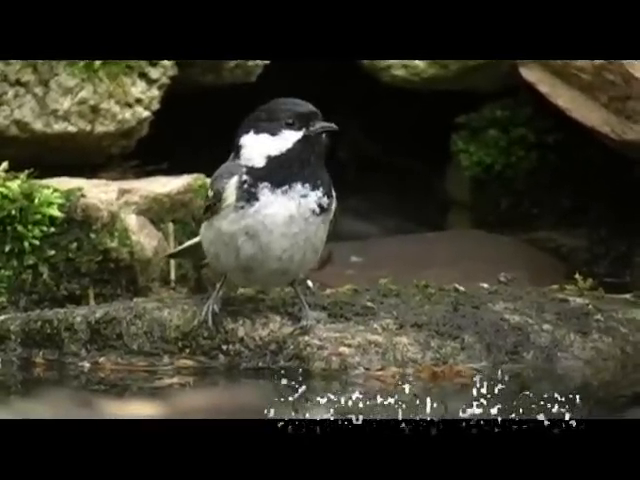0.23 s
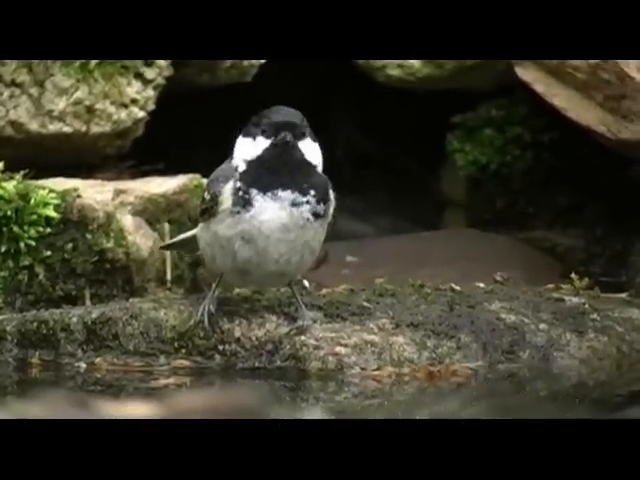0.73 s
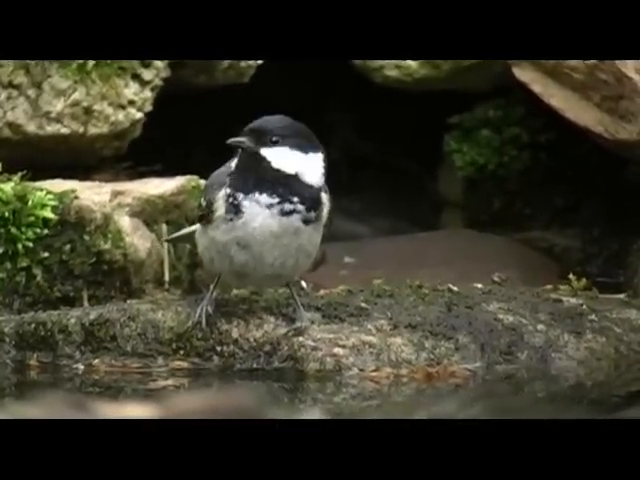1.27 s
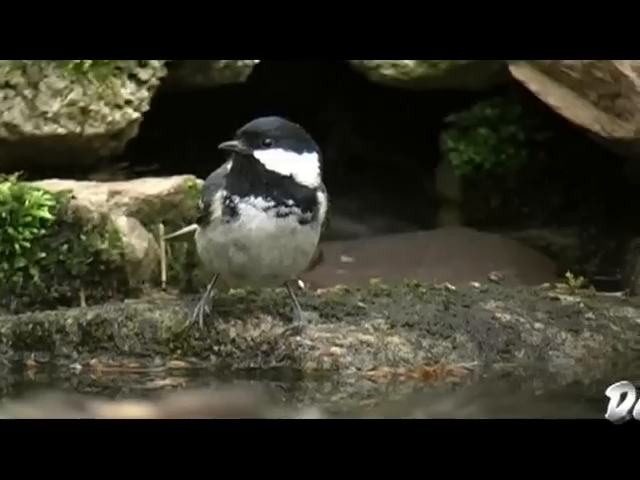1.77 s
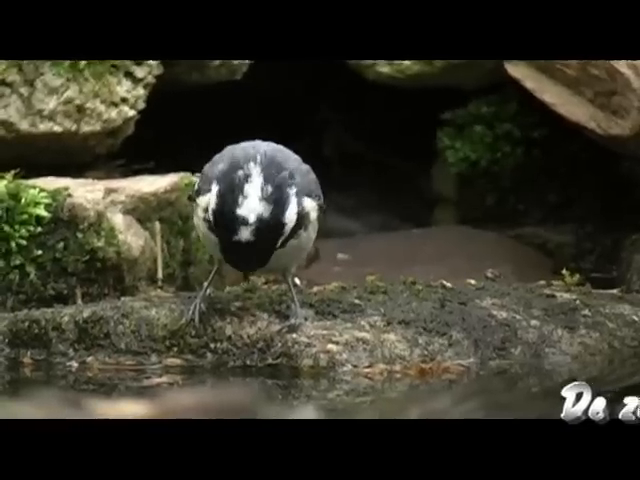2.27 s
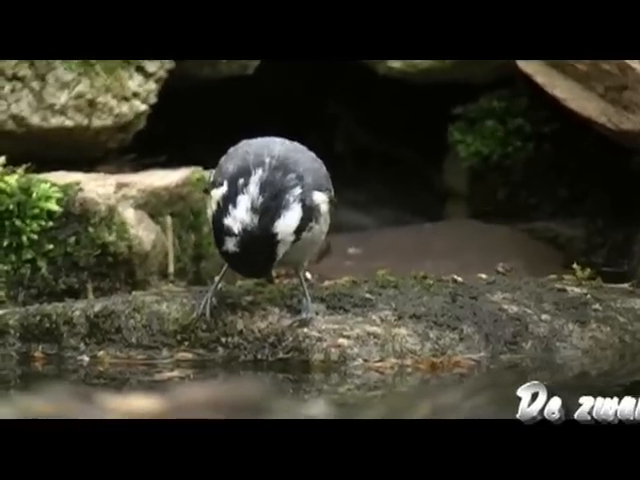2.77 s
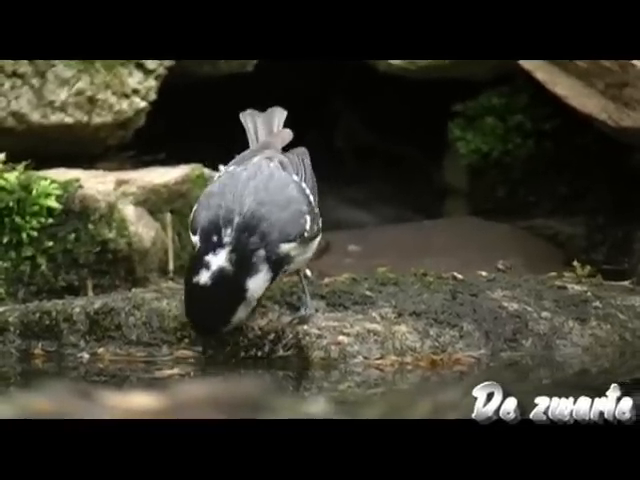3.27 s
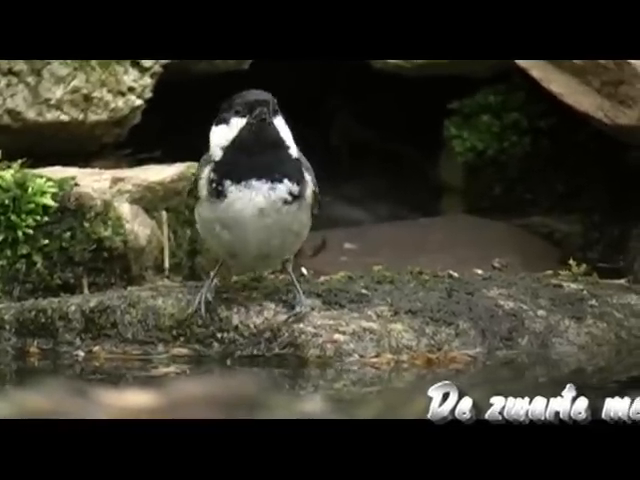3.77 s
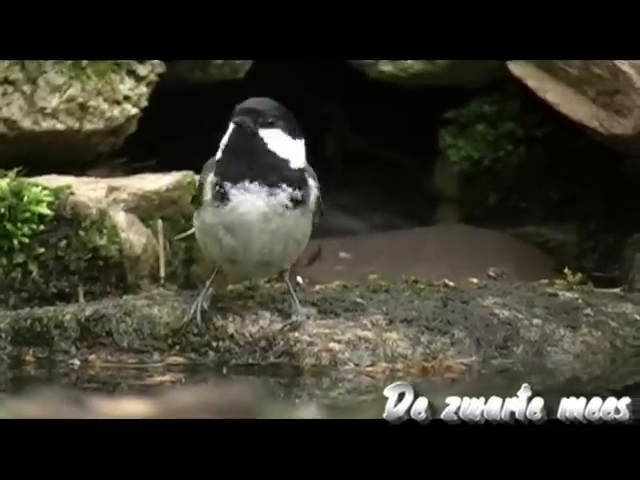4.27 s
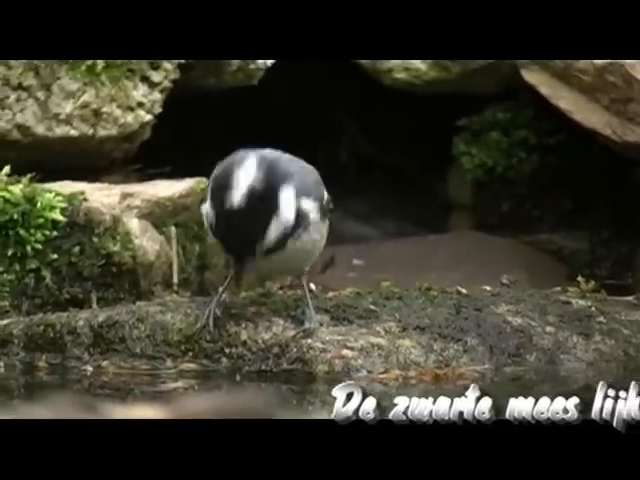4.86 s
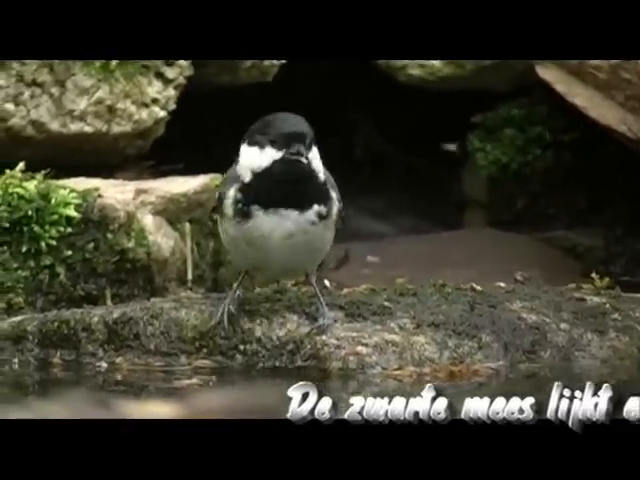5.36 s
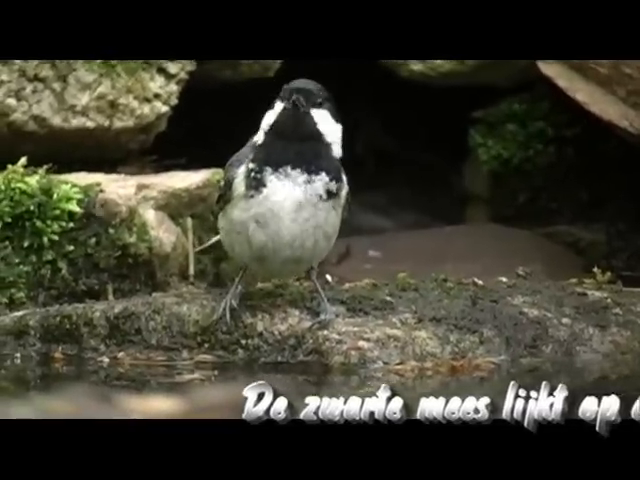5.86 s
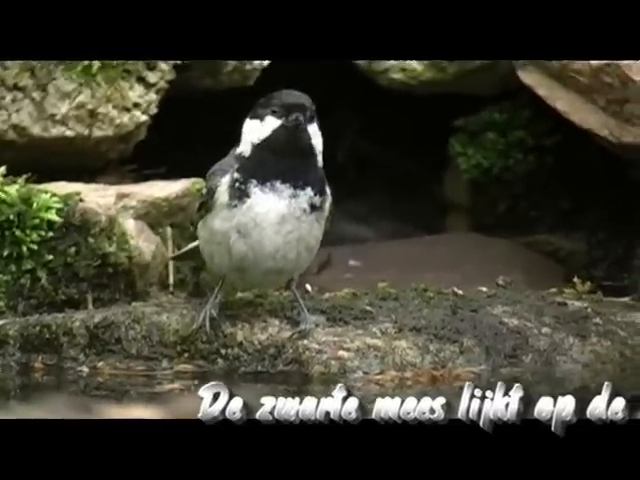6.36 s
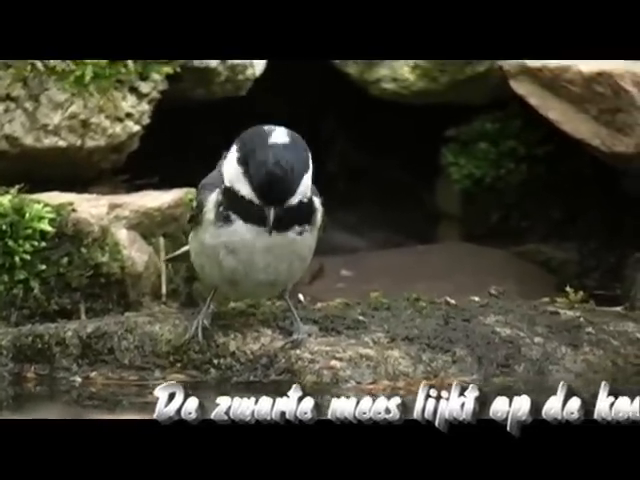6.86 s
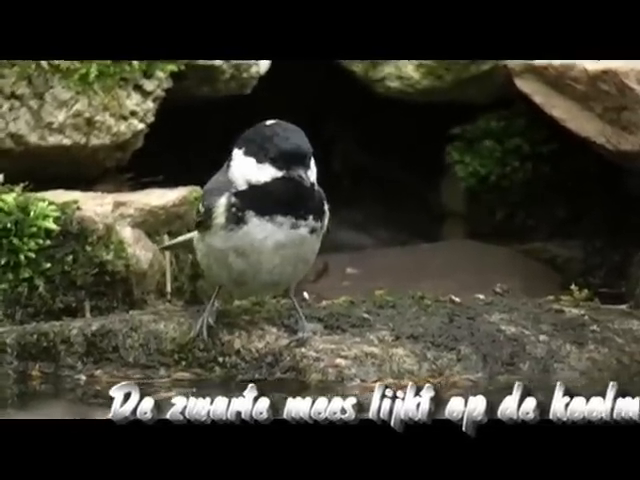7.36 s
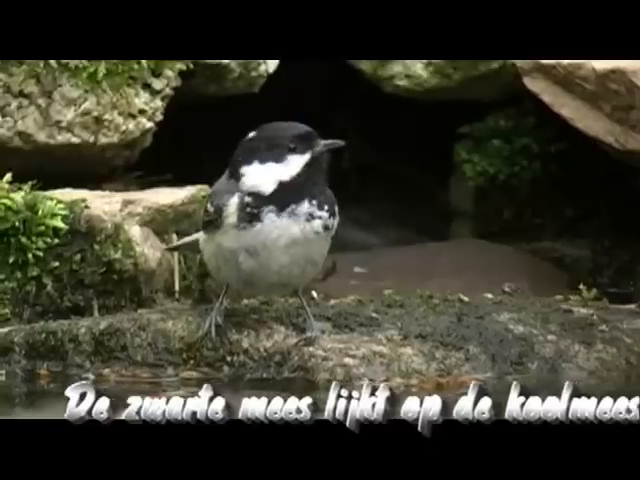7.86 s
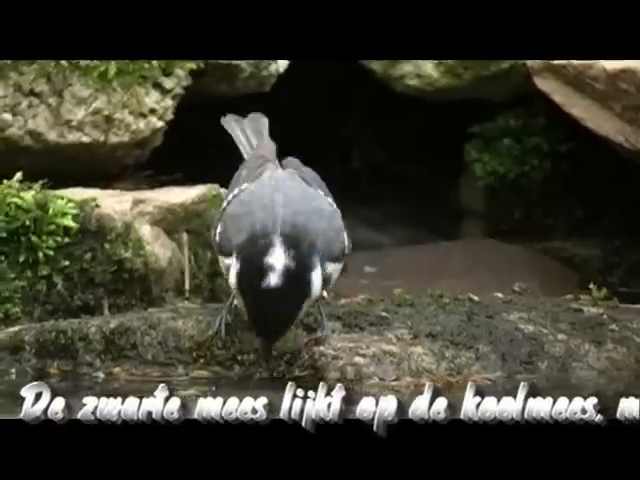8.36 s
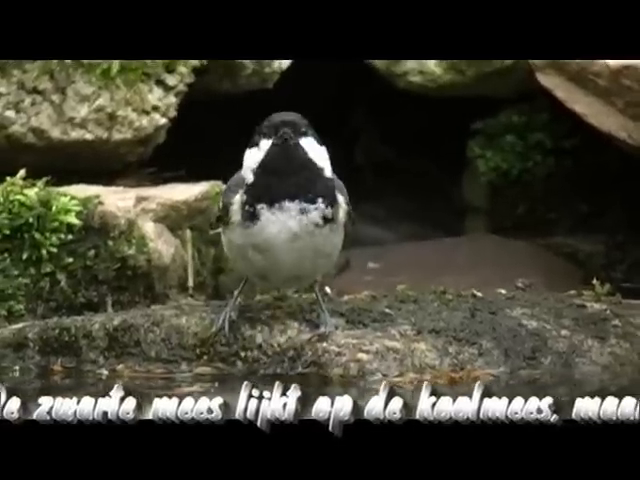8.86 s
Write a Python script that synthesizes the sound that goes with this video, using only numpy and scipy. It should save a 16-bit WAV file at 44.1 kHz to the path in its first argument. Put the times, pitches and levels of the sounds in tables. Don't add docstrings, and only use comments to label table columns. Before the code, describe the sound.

A small bird sings two brisk phrases of high seesawing whistles in a walled garden, with lower thrush-like warbles between, over distant traffic and hum.

```python
import sys
import numpy as np
from scipy import signal
from scipy.io import wavfile
from scipy.ndimage import uniform_filter1d

SR = 44100
rng = np.random.default_rng(int(sys.argv[2]) if len(sys.argv) > 2 else 0)


def field_ratio(decibels):
    return 10 ** (np.asarray(decibels, dtype=float) / 20)


def to_wav(s):
    ch = np.atleast_2d(s).T
    pcm = np.round(np.clip(ch, -1, 1) * 32767)
    wavfile.write(sys.argv[1], SR, pcm.astype(np.int16))


N = 401751


def unit_rms(x):
    return x / np.sqrt(np.mean(x ** 2) + 1e-20)


def read_spectrum(points, hz):
    f, value = np.transpose(points)
    return np.interp(np.log(hz + 1), np.log(f + 1), value)


def fader(rows):
    db = np.interp(np.arange(N) / SR, *np.transpose(rows))
    return field_ratio(uniform_filter1d(db, size=2000))


def add(mix, start_s, sound):
    part = mix[round(start_s * SR):][:len(sound)]
    part += sound[:len(part)]


def drift(count, size):
    smooth = uniform_filter1d(rng.standard_normal(count), size)
    return unit_rms(uniform_filter1d(smooth, size))


# pitch_hz, likeness (0 to 1)
LIKENESS = [(130, 0.99), (290, 0.87), (640, 0.18), (1400, 0.069), (3100, 0.59), (6800, 0.7), (15000, 0.31)]


def noise(spectrum, patchy_db):
    frames = N // 256 + 5
    hz = np.arange(0, spectrum[-1][0], SR / 1024)
    a, b, c, d, patches = rng.standard_normal((frames, len(hz), 5)).T
    patches = uniform_filter1d(patches, size=12, axis=0)
    patches = unit_rms(uniform_filter1d(patches, size=20, axis=1))
    same = np.clip(read_spectrum(LIKENESS, hz), -1, 1)[:, None]
    left = a + 1j * b
    right = same * left + np.sqrt(1 - same ** 2) * (c + 1j * d)
    z = np.array([left, right]) * field_ratio(read_spectrum(spectrum, hz)[:, None] + patchy_db * patches)
    z = np.pad(z, ((0, 0), (0, 513 - len(hz)), (0, 0)))
    return unit_rms(signal.istft(z, nperseg=1024, noverlap=768)[1][:, :N])


def fuzzy_line(hz, width_hz):
    r = np.exp(-np.pi * width_hz / SR)
    source = rng.standard_normal((N, 2)) @ [1, 1j]
    wander = signal.lfilter([1], np.convolve([1, -r], [1, -r]), source)
    wander /= np.sqrt(np.mean(abs(wander) ** 2))
    return wander * np.exp(2j * np.pi * hz * np.arange(N) / SR)


def tail(x, t60_s, start_s, alike):
    size = round(min(t60_s, 1) * SR)
    at = np.arange(round(start_s * SR), size - 20, 20)
    at = at + rng.integers(0, 20, (2, len(at)))
    taps = np.zeros((2, size))
    np.put_along_axis(taps, at, rng.choice([-1., 1.], at.shape), 1)
    taps *= field_ratio(-60 * np.arange(size) / SR / t60_s)
    taps[1] = alike * taps[0] + np.sqrt(1 - min(alike, 1) ** 2) * taps[1]
    return signal.oaconvolve(x[None], taps / np.linalg.norm(taps[0]), axes=1)[:, :N]


def tone(hz, db):
    count = np.arange(len(hz))
    edge = np.minimum(np.minimum(count, count[::-1]) / 130, 1)
    return np.sqrt(2) * field_ratio(db) * edge * np.sin(2 * np.pi * np.cumsum(hz) / SR)


def played(notes, gesture, depth_hz, s0=0, factor=1, db0=0):
    laid = []
    for s, length, first_hz, second_hz, db in notes:
        rows = [(s0 + s + u * length, factor * (first_hz + v * (second_hz - first_hz)), db0 + db + d)
                for u, v, d in gesture]
        laid.append((depth_hz, rows))
    return laid


def whistles(tables, warble_hz, regular, throb_db, unsteady=0.204, grow_s=0.0398):
    out = np.zeros(N)
    for depth_hz, rows in tables:
        s, *columns = np.transpose(rows)
        t = np.arange(s[0], s[-1], 1 / SR)
        hz, db = (np.interp(t, s, c) for c in columns)
        beat = np.cumsum(warble_hz * (1 + unsteady * drift(len(t), size=900))) / SR
        grown = np.minimum((t - s[0]) / grow_s, 1)
        shake = grown * (regular * np.sin(2 * np.pi * beat) + (1 - regular) * drift(len(t), size=70))
        turns = 2 if throb_db < 0 else 1
        throb = throb_db * grown * min(depth_hz / 80, 1) * np.cos(2 * np.pi * beat * turns)
        hz = uniform_filter1d(hz, size=150) + depth_hz * shake
        add(out, s[0], tone(hz, db + throb + 1.6 * drift(len(t), size=200)))
    return out


# time_s, level_db
HUM_SWELL = [(0, -40), (1.8, -40.5), (2.5, -36), (4, -38), (5.2, -38.5), (6.5, -41.5), (8, -40.5),
             (9.11, -38.5)]
# pitch_hz, level_db, width_hz
WHINES = [
    (15623, -72, 2),
    (5100, -67, 12),
    (2400, -68, 15),
]
# time_s, level_db
TRAFFIC_SWELL = [(0, -45.5), (.5, -47.5), (1.3, -46), (2.3, -40.5), (2.8, -43.5), (3.6, -38), (4.1, -44.5),
                 (4.7, -38.5), (5.2, -48), (5.7, -44.5), (6.5, -50), (7.5, -47), (8.3, -48), (9.11, -45.5)]
# pitch_hz, level_db
ROAR_COLOUR = [(90, -46), (120, -1.5), (220, 1.5), (300, -12), (350, -3.5), (420, -15), (465, -8.5),
               (600, -13), (900, -26.5), (1500, -64)]
# pitch_hz, level_db
RUMBLE_COLOUR = [(15, -41), (28, -22), (42, 1.5), (60, 6), (85, -22), (110, -13.5), (200, -32)]
# pitch_hz, level_db
HISS_COLOUR = [(150, -48), (300, -3.5), (700, -3.5), (1500, -4.5), (3000, -11.5), (5500, -12), (8000, -14),
               (15800, -17)]
# time_s, level_db
CHATTER_SWELL = [(0, -56), (1.2, -55.5), (1.8, -53), (2.25, -50), (2.6, -51), (3.5, -47), (4.1, -40),
                 (4.6, -34.5), (5.1, -43.5), (5.7, -50.5), (6.3, -49), (7.5, -52.5), (8.3, -47), (8.5, -47),
                 (8.75, -49), (9.11, -51)]
# pitch_hz, level_db
CHATTER_COLOUR = [(1800, -12), (2500, -4), (3300, 0), (4500, 3), (6000, -4), (7200, -21.5), (8500, -32)]


def background():
    steady_hum = np.exp(2j * np.pi * 149.8 * np.arange(N) / SR)
    hum = .75 * steady_hum + .95 * fuzzy_line(150.5, 15)
    hum = fader(HUM_SWELL) * field_ratio(6) * np.real([hum, hum * np.exp(2.1j)])
    whines = sum(field_ratio(db) * fuzzy_line(hz, width_hz).real for hz, db, width_hz in WHINES)
    traffic = fader(TRAFFIC_SWELL)
    roar = traffic * field_ratio(2.5) * noise(ROAR_COLOUR, 1.6)
    rumble_swell = (traffic / field_ratio(-48.5)) ** 0.27
    rumble = field_ratio(-48) * rumble_swell * noise(RUMBLE_COLOUR, 0.65)
    flicker = field_ratio(1.1 * drift(N, size=3500))
    hiss = field_ratio(-48.5) * flicker * noise(HISS_COLOUR, .8)
    chatter = fader(CHATTER_SWELL) * noise(CHATTER_COLOUR, 2.4)
    return hum + whines + roar + rumble + hiss + chatter


# pitch_hz, level_db, t60_s
KNOCK_MODES = [
    (426, -15.5, 0.02),
    (880, -30, 0.03),
    (1440, -30, 0.021),
]


def knock():
    out, t = np.zeros(N), np.arange(3000) / SR
    attack = np.minimum(t / 0.00091, 1)
    for hz, db, t60_s in KNOCK_MODES:
        add(out, 6.2095, field_ratio(db - 60 * t / t60_s) * attack * np.sin(2 * np.pi * hz * t))
    return out * field_ratio([[1.5], [-1.5]])


# length_share, share of the way from first to second pitch, level_db
SLIDE = [(0, 0, -7), (.5, .5, 0), (1, 1, -5)]
SETTLE = [(0, 0, -5), (.07, .6, 2), (.15, .92, 0), (.4, .98, -1), (1, 1, -3)]
DIP = [(0, 0, 1), (.1, .65, 1), (.33, 1, -7), (.5, .8, -11), (1, .75, -17)]
FADE = [(0, 0.014, 1), (.3, 0.72, -0.5), (1, 1, -28)]
# start_s, length_s, first_pitch_hz, second_pitch_hz, level_db
FAR_SETTLES = [(5.23, 0.071, 8300, 4500, -36), (5.56, .055, 7900, 5350, -36.5),
               (5.922, 0.12, 7800, 4490, -34.5), (6.265, .05, 7100, 5300, -33.5)]
FAR_DIPS = [(4.27, 0.15, 4800, 3550, -35.5), (4.92, 0.15, 5300, 3530, -34),
            (5.605, 0.21, 5300, 3550, -37.5), (6.305, 0.19, 5300, 3500, -35.5), (.29, .13, 5700, 3820, -49)]
# start_s, length_s, first_pitch_hz, second_pitch_hz, level_db
FAR_SLIDES = [(1.0, 0.1, 3476, 3590, -47.5), (1.155, 0.12, 3520, 3720, -47.5), (1.3, .11, 5220, 4870, -52),
              (5.8, .12, 2200, 2200, -57), (5.96, .15, 2180, 2124, -55), (6.49, 0.057, 3230, 3250, -50),
              (7.05, .07, 3190, 3250, -47.5), (7.15, 0.044, 3210, 3510, -51), (7.68, 0.12, 3990, 3920, -38),
              (8.6, 0.047, 4460, 4390, -41), (8.6, 0.041, 3600, 3640, -43.5), (8.81, 0.13, 3480, 3550, -48),
              (9.01, 0.0217, 3680, 3020, -39), (9.075, 0.061, 3230, 3690, -44),
              (8.94, 0.04, 5260, 5250, -50), (3.55, .13, 3000, 2830, -52), (6.2, .04, 2090, 1950, -51),
              (8.368, 0.025, 5900, 5520, -41), (8.525, .03, 5900, 5560, -52), (.857, .03, 7750, 7150, -53),
              (4.56, .13, 5420, 5380, -40), (4.77, .11, 4020, 3980, -40), (4.81, .06, 5400, 5400, -43),
               (4.57, .14, 10800, 10750, -58), (5.04, .1, 4000, 4000, -45), (5.695, .09, 3900, 3900, -40),
               (5.86, .07, 4450, 4480, -46), (5.6, .12, 5650, 5650, -46), (5.77, .08, 5000, 5050, -48),
               (6.21, .13, 3450, 3400, -54), (6.22, .1, 3180, 3150, -54), (7.855, .04, 3880, 3900, -44),
               (8.388, .03, 3850, 3900, -44), (4.65, .05, 6600, 6550, -44), (4.22, .05, 5400, 5400, -36),
               (5.47, .08, 7250, 5600, -55), (4.92, .07, 5350, 5400, -41), (4.53, .04, 3900, 4050, -42),
               (.058, .052, 6900, 3750, -50), (.83, .1, 5050, 4950, -56), (1.19, .07, 5100, 5080, -55),
               (.835, .022, 7000, 7700, -57), (5.27, .07, 2250, 1900, -51), (8.69, .025, 5750, 5700, -52)]
FAR_RASPS = [(1.62, 0.25, 5300, 5110, -51), (4.5, 0.06, 3000, 4195, -32.5), (4.74, 0.13, 3120, 4700, -42.5),
             (5.23, 0.2, 3150, 5000, -36.5), (8.46, 0.07, 3800, 2600, -46.5),
             (8.86, 0.103, 2700, 3300, -46), (8.64, .1, 3300, 2700, -49), (2.2, 0.098, 3800, 3120, -46.5),
             (5.56, .14, 3290, 3400, -69), (4.09, 0.0192, 3300, 2450, -34.5), (4.5, 0.068, 5730, 6300, -42),
             (4.74, 0.054, 5800, 6500, -46), (8.27, 0.06, 4900, 3700, -43.5)]
FAR_FADES = [(0.002, .03, 8250, 8050, -45), (0.065, .045, 8000, 8250, -47), (0.145, .04, 8000, 8150, -51),
             (2.192, .15, 4900, 4050, -42), (2.19, .12, 6200, 5000, -47), (4.522, .2, 10100, 10100, -55),
             (4.558, .08, 6950, 6600, -38), (4.565, .15, 4500, 4250, -33), (4.802, .07, 6900, 6600, -41),
             (4.887, .14, 5620, 5460, -34), (6.04, .1, 4400, 3900, -41)]


def far_birds():
    hoarse_hz = 380
    calls = played(FAR_SETTLES, SETTLE, 60) + played(FAR_DIPS, DIP, 110)
    calls += played(FAR_SLIDES, SLIDE, 25)
    calls += played(FAR_RASPS, SLIDE, hoarse_hz) + played(FAR_FADES, FADE, hoarse_hz * 0.53)
    return whistles(calls, 68.56, 0.286, 7.6)


# length_share, share of the way from first to second pitch, level_db
SWELL = [(0, 0, -14), (.4, 0.61, -6.5), (1, 1, 1.5)]
SINK = [(0, 0.024, -2), (0.252, .4, 0.5), (0.448, .68, 5), (.7, .85, -9.5), (1, 0.92, -16.5)]
DROP = [(0, 0.16, 5), (.08, 0.03, -2), (.22, .75, 2.5), (.45, .95, -8.5), (1, 1, -26)]
HUMP = [(0, 0.041, 0.5), (.35, .8, -0.5), (.6, 1, 1), (1, .3, -5.5)]
# start_s, pitch_factor, level_db
FIGURES = [
    (1.82, 1.0, -2.5),
    (8.422, 1.0, -0.5),
]
# start_s, length_s, first_pitch_hz, second_pitch_hz, level_db
FIGURE_DROP = [(0.002, .07, 2440, 1400, -42.5)]
FIGURE_STEPS = [
    (.14, 0.087, 1690, 1922, -33),
    (.235, 0.0605, 2116, 2316, -32),
]
FIGURE_WARBLE = [(.39, .26, 2358, 1620, -32.5)]
THRUSH_SWELLS = [(2.51, 0.058, 1400, 1680, -38.5), (3.22, 0.057, 1294, 1660, -40),
                 (3.885, .05, 1516, 1816, -30)]
THRUSH_SLIDES = [(3.205, 0.064, 2000, 3400, -37.5), (3.93, 0.051, 1800, 1280, -36.5),
                 (3.945, 0.029, 2550, 2240, -40), (2.66, 0.11, 1600, 1660, -39.5)]
THRUSH_SINKS = [(2.86, 0.18, 2337, 1734, -26.5)]
# time_s, pitch_hz, level_db
THRUSH_HELD = [(3.28, 1658, -36), (3.429, 1720, -35.5), (3.55, 1517, -36), (3.699, 1368, -38.5),
               (3.74, 1427, -44.5), (3.89, 1477, -39)]
THRUSH_BURST = [(2.567, 0.093, 2131, 2154, -33)]
THRUSH_WARBLE = [(2.713, .135, 1830, 2070, -30.5)]
THRUSH_RATTLE = [
    (3.7575, 0.12, 1858, 1884, -40.5),
    (3.7575, .15, 2384, 2440, -46.5),
]
THRUSH_BUZZES = [
    (4.11, .055, 1810, 1831, -41.5),
    (4.16, .3, 2020, 2360, -43.5),
]
THRUSH_GURGLE = [(4.21, .24, 1437, 1596, -44.5)]


def thrush_song():
    song = [(40, THRUSH_HELD)] + played(THRUSH_SWELLS, SWELL, 0)
    song += played(THRUSH_SLIDES, SLIDE, 0) + played(THRUSH_SINKS, DROP, 0)
    for figure in FIGURES:
        song += played(FIGURE_DROP, SLIDE, 0, *figure) + played(FIGURE_STEPS, SWELL, 0, *figure)
        song += played(FIGURE_WARBLE, SINK, 135, *figure)
    out = whistles(song, 58, .72, 5)
    # notes, depth_hz, rate_hz, regularity, throb_db
    shaken = [(THRUSH_BURST, 330, 35, .75, -6),
              (THRUSH_WARBLE, 95, 58, .8, 6),
              (THRUSH_RATTLE, 70, 80, .6, 9),
              (THRUSH_BUZZES, 140, 44, .5, 5),
              (THRUSH_GURGLE, 100, -33, .65, 6)]
    for notes, depth_hz, rate_hz, regular, throb_db in shaken:
        out += whistles(played(notes, HUMP, depth_hz), rate_hz, regular, throb_db, .06, .006)
    return out


# start_s, length_s, first_pitch_hz, second_pitch_hz, level_db
PICKUP = (-.044, .032, 3380, 4150, -41)
# start_s, end_s, chip_spacing_s, level_db
TRILLS = [
    (7.949, 8.046, 0.0095, -41),
    (8.142, 8.245, 0.011, -41.5),
    (8.35, 8.45, 0.011, -41.5),
]


def trills():
    out, u = np.zeros(N), np.linspace(0, 1, 440)
    for start, end, gap, db in TRILLS:
        out += whistles(played([PICKUP], SLIDE, 0, start), 1, 0, 0)
        for s in np.arange(start - 2 * gap, end, gap):
            late, high, strong = rng.standard_normal(3)
            early = max(start - s, 0) / gap
            hz = 3600 + 260 * early - 700 * (s - start) + 40 * high - 760 * u
            chip = np.hanning(440) * tone(hz, db + 3 - 4 * early + 1.8 * strong)
            add(out, s - .005 + .0005 * late, chip)
    return out + field_ratio(-12) * tail(out, .4, .003, .8)


# delay_s, spread_s, level_db
WALLS = [
    (.007, .003, -23),
    (.03, .006, -17),
    (.157, .008, -15),
    (.315, .012, -28),
]


def garden(x):
    taps = np.zeros(SR // 2)
    for delay_s, spread_s, db in WALLS:
        burst = rng.standard_normal(1500) * np.exp(-np.arange(1500) / SR / spread_s)
        add(taps, delay_s, field_ratio(db - 7) * burst / np.linalg.norm(burst))
        taps[round(delay_s * SR)] += field_ratio(db)
    favoured = signal.butter(2, [5050, 7000], "band", fs=SR, output="sos")
    echoes = signal.sosfilt(favoured, signal.oaconvolve(x, taps)[:N])
    near = field_ratio(-17) * tail(x, .16, .004, .9)
    diffuse = field_ratio(-16) * tail(x, 0.85, 0.036, 0.94)
    return (x + echoes) * field_ratio([[-.4], [.4]]) + near + diffuse


# start_s at the knee, length_s after the knee, final_pitch_hz, level_db
FALLS = [(2.491, 0.057, 4530, -26.5), (2.785, 0.061, 4460, -20.5), (3.073, 0.063, 4464, -16.5),
         (3.36, 0.062, 4456, -17), (3.657, 0.062, 4495, -18.5), (3.952, 0.057, 4520, -17),
         (6.424, 0.057, 4505, -23.5), (6.716, 0.06, 4465, -18), (7.002, 0.054, 4495, -15.5),
         (7.292, 0.052, 4480, -14.5), (7.583, 0.06, 4470, -18), (7.885, 0.053, 4500, -16)]
ARCHES = [(2.673, 0.04, 5390, -18.5), (2.958, 0.042, 5315, -16), (3.249, 0.04, 5390, -13.5),
          (3.54, 0.041, 5340, -15), (3.838, 0.036, 5460, -15), (4.125, 0.029, 5340, -11.5),
          (6.608, 0.037, 5330, -15.5), (6.891, 0.041, 5344, -12.5), (7.177, 0.0328, 5320, -10.5),
          (7.464, 0.041, 5320, -12), (7.764, 0.045, 5350, -13), (8.059, 0.04, 5440, -13)]
# time_s from the knee, pitch_factor on the final pitch, level_db
FALL_SHAPE = [(-.012, 1.9, -45), (-.007, 1.55, -20.5), (0, 1.313, -9.5), (.008, 1.19, 1.5), (.025, 1.08, 3),
              (.042, 1.01, 0), (.051, 1., -2.5), (0.054, 0.99, -26)]
CLIMB_SHAPE = [(-.064, .62, -39), (-.055, .73, -22), (-.047, .98, -12), (-.043, 1.25, -14.5),
               (-.038, 1.54, -38), (-.029, 1.63, -38.5)]
ARCH_SHAPE = [(-.018, 1.52, -34), (-.01, 1.36, -14), (0, 1.096, -5.5), (.008, 1.035, -3.5),
              (0.015, 1.01, -0.5), (.04, 1.003, -4), (.043, 1.1, -6)]
LEAD_SHAPE = [(-.062, 1.1, -25), (-.057, 1.22, -17), (-.051, 1.36, -33), (-.045, 1.62, -31)]


def singer():
    out = np.zeros(N)
    voices = [(FALLS, FALL_SHAPE), (ARCHES, CLIMB_SHAPE + ARCH_SHAPE), (ARCHES, LEAD_SHAPE)]
    for notes, shape in voices:
        u, factor, shape_db = np.transpose(shape)
        for s, length, end_hz, db in notes:
            at = np.where(u > 0, u * length / u[-2], u)
            t = np.arange(at[0], at[-1], 1 / SR)
            bend = uniform_filter1d(np.interp(t, at, factor), size=120)
            hz = end_hz * bend + 25 * drift(len(t), size=60)
            note_db = db + np.interp(t, at, shape_db) + 1.1 * drift(len(t), size=50)
            add(out, s + at[0], tone(hz, note_db))
    return out


def scene():
    thrush = thrush_song()
    thrush = thrush * field_ratio([[-4.5], [-1.5]]) + field_ratio(-4.5) * tail(thrush, .45, .003, .0)
    far = far_birds()
    far_near = tail(far, .25, .002, .9) * field_ratio(-2.5)
    far_late = tail(far, .8, .02, .75) * field_ratio(-4.5)
    far = far * field_ratio(-6.5) + far_near + far_late
    bed = background() * field_ratio([[-.5], [.5]])
    return garden(singer()) + thrush + far + trills() + knock() + bed


def roll_off(x):
    return signal.sosfilt(signal.butter(12, 16250, fs=SR, output="sos"), x)


def record(dry):
    bass_cut = signal.butter(3, 46, "high", fs=SR, output="sos")
    band_limit = signal.firwin(401, 15800, window=("kaiser", 8), fs=SR)
    mix = signal.oaconvolve(signal.sosfilt(bass_cut, dry), band_limit[None], "same")
    return roll_off(mix)


dry = scene()
out = record(dry)
to_wav(out)
```